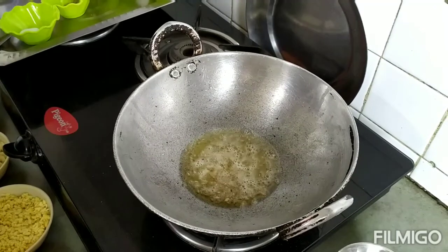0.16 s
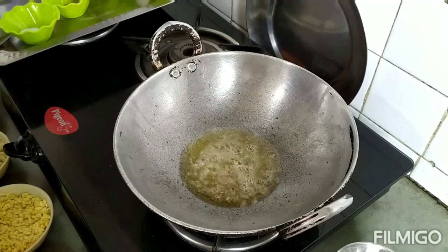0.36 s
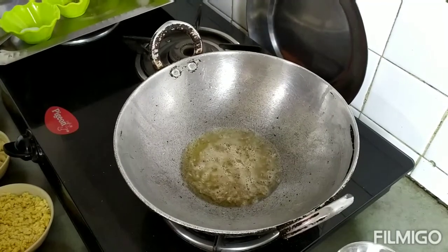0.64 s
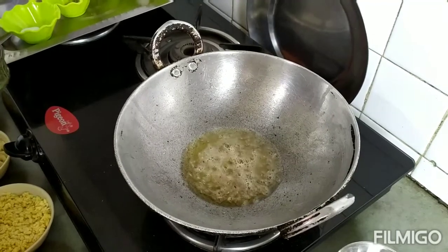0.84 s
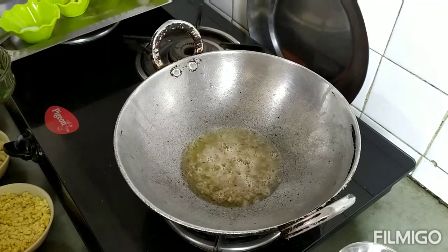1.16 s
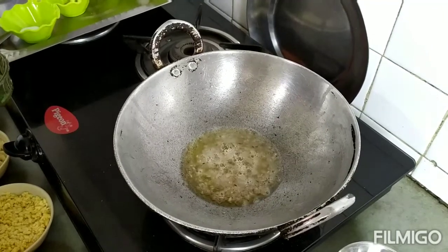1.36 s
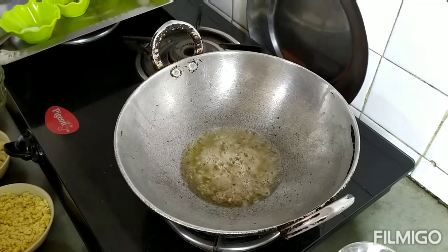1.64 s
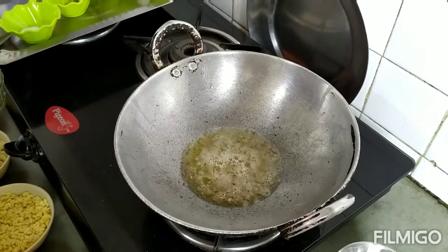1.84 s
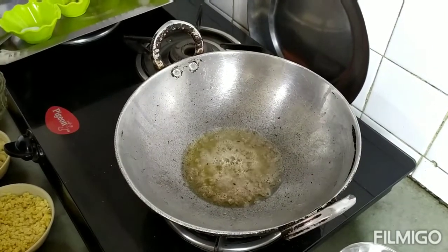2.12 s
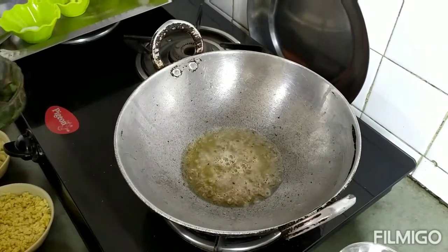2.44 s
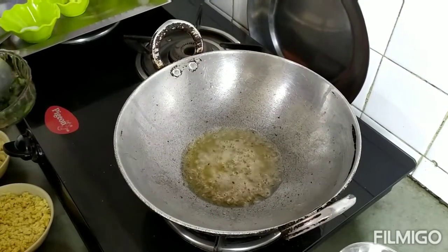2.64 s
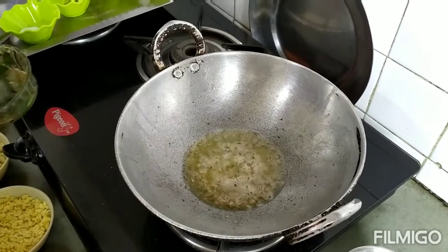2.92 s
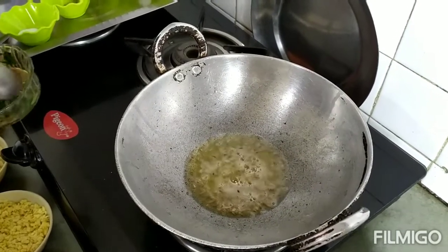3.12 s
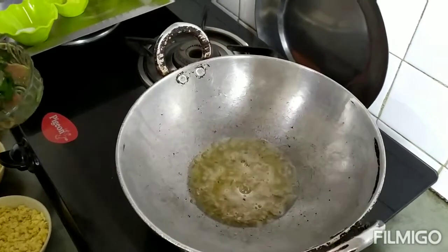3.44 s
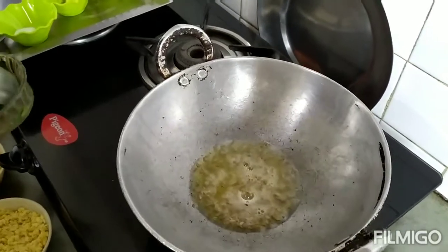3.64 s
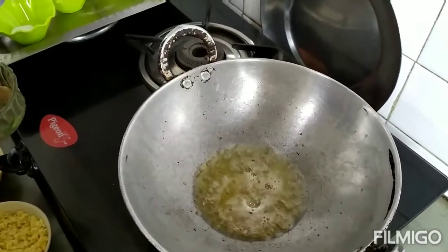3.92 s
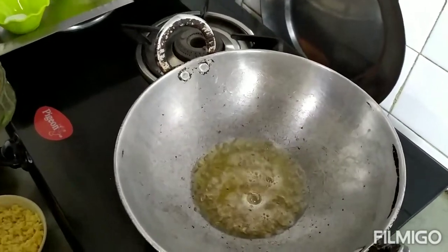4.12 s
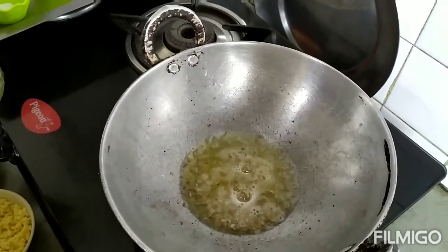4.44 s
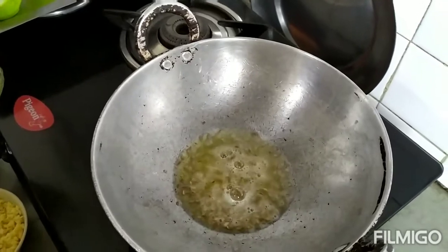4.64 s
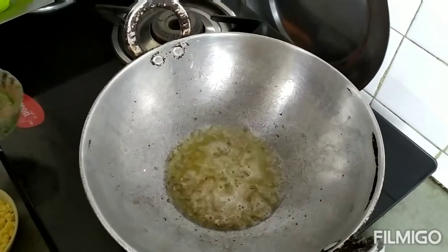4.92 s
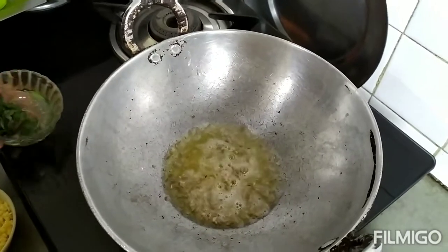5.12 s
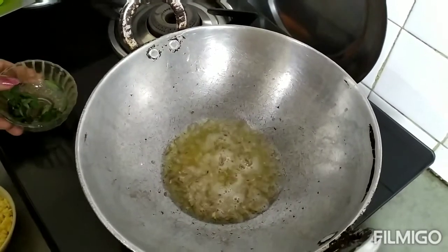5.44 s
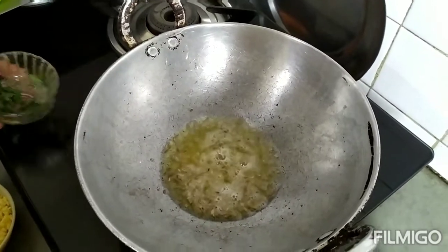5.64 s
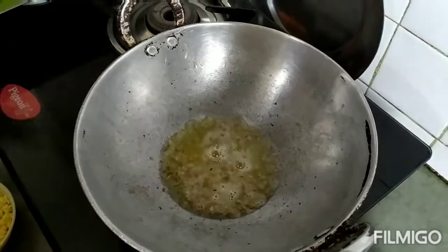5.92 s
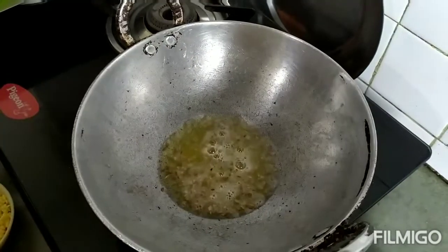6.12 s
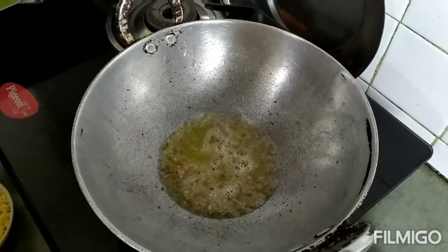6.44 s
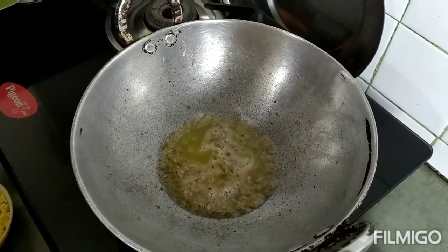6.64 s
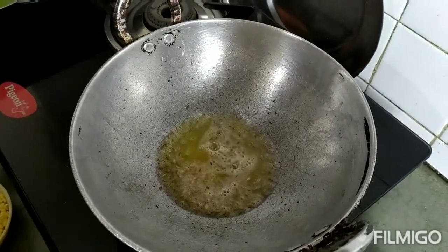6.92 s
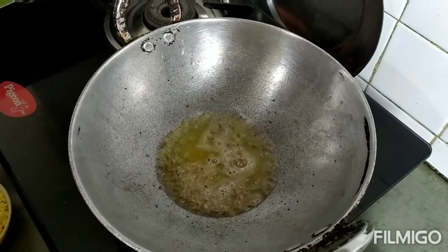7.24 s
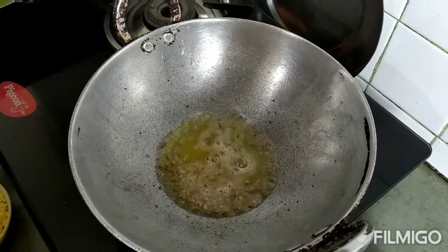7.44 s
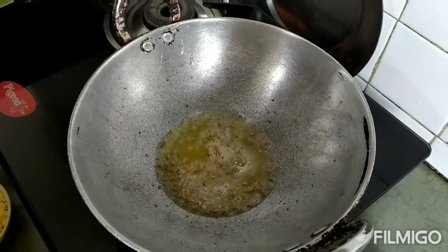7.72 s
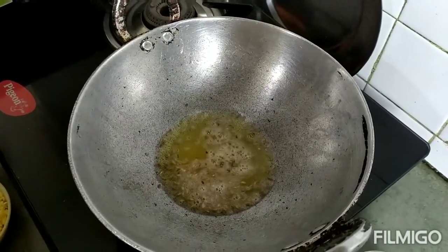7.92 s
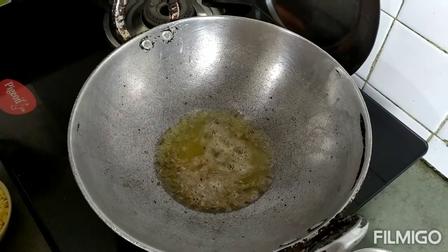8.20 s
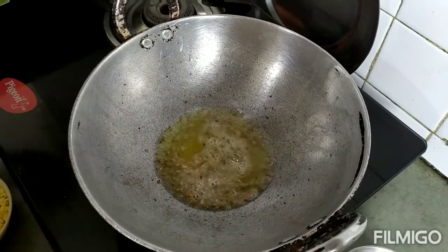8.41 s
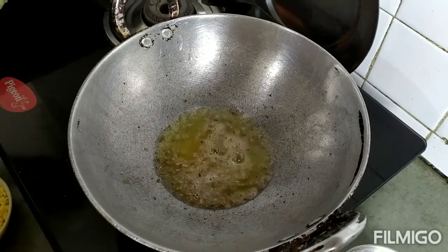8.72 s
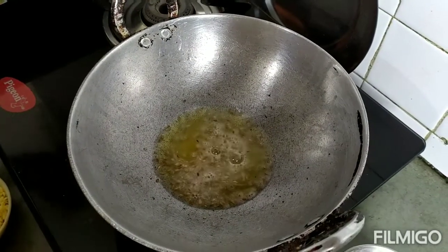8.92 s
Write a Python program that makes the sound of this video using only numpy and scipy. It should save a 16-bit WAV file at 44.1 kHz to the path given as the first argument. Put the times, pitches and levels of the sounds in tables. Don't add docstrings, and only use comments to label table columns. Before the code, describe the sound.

Sparse weak pops open the scene, then sharper, brighter seed cracks come unevenly from hot oil in a metal bowl-shaped pan. Glass clinks ring briefly in the middle, the sizzle rises a little, and a dish knocks and scrapes gently. The phone is held close, with light handling rustle and low taps on the left, in a hard, tiled home kitchen with short reverberation.

```python
import sys
import numpy as np
from scipy import signal
from scipy.io import wavfile
from scipy.ndimage import uniform_filter1d

SR = 44100
rng = np.random.default_rng(int(sys.argv[2]) if len(sys.argv) > 2 else 0)


def generate_wav(sig):
    pcm = np.round(np.clip(np.atleast_2d(sig).T, -1, 1) * 32767).astype(np.int16)
    wavfile.write(sys.argv[1], SR, pcm)


def amplitude_ratio(level_db):
    exponent = np.asarray(level_db, float) / 20
    return 10 ** exponent


N = 399987


def rms_one(x):
    return x / np.sqrt(np.mean(x ** 2) + 1e-20)


def at_hz(points, hz):
    points = np.array(points)
    return np.interp(np.log(hz), np.log(points[:, 0]), points[:, 1])


def in_time(rows):
    s, *columns = np.transpose(rows)
    return [np.interp(np.arange(N) / SR, s, column) for column in columns]


def drift(rate):
    r = np.exp(-80 * np.pi * rate / SR)
    white = rng.standard_normal(N // 40 + 2002)
    slow = signal.lfilter([1], [1, -2 * r, r * r], white)[2000:]
    return np.interp(np.arange(N) / 40, np.arange(len(slow)), rms_one(slow))


def ring(x, hz, t60):
    r, w = amplitude_ratio(-60 / (t60 * SR)), 2 * np.pi * hz / SR
    return signal.lfilter([0, np.sin(w)], [1, -2 * r * np.cos(w), r * r], x + 1e-18)


def resonate(x, peaks):
    return sum(amplitude_ratio(db) * np.sqrt(width) * ring(x, hz, 2.2 / width) for hz, width, db in peaks)


def bands(white, low_hz, high_hz):
    edges = low_hz * 2 ** np.arange(0, np.log2(high_hz / low_hz), .4)
    for k, (low, high) in enumerate(zip(edges, edges[1:])):
        band = signal.butter(2, [low, high], "band", fs=SR, output="sos")
        yield np.sqrt(low * high), signal.sosfilt(band, white[k % 2])


def coloured(white, spectrum, patchy_db):
    parts = bands(white, spectrum[0][0], spectrum[-1][0] * 1.2)
    return rms_one(sum(amplitude_ratio(at_hz(spectrum, hz) + patchy_db * drift(16)) * part for hz, part in parts))


def grains(per_s, spread_db, shape):
    sizes = amplitude_ratio(spread_db * np.minimum(rng.exponential(1, shape), 5)) * rng.choice([-1, 1], shape)
    return rms_one(sizes * (rng.random(shape) < per_s / SR))


def strokes(rows, fades_db_per_s):
    t = np.arange(N) / SR
    gain = 0
    for s, db, attack, hold in rows:
        rise_db = 25 * np.clip(1 - (t - s) / attack, 0, 9)
        fade_db = fades_db_per_s * np.maximum(t - s - attack - hold, 0)
        gain = gain + amplitude_ratio(db - rise_db - fade_db) * (t > s)
    return gain


def add(track, sound, s):
    i = round(s * SR)
    track[..., i:i + sound.shape[-1]] += sound[..., :N - i]


# t/s, peak level/dB, cavity f/Hz, left-right level/dB, low thud level/dB
POPS = [(0.072, -39, 3490, 2, -18.5), (1.091, -46, 3270, 3, -40), (1.944, -19.5, 3570, -6, -31),
        (2.176, -32.5, 3230, -7.5, -18), (2.836, -42, 3590, -4, -8.5), (2.859, -44, 2820, -7, -6),
        (2.88, -40.5, 2840, 5, -29.5), (2.907, -46, 2830, 1, -11.5), (3.748, -34.5, 3100, -1.5, -19),
        (3.809, -20, 2640, -7, -42), (4.295, -20.5, 2780, -2, -12), (4.489, -31, 2860, -2, -19.5),
        (4.993, -21.5, 3900, 13, -35), (5.398, -12, 3300, 9.5, -19.5), (5.64, -30.5, 3230, 16, -24),
        (6.123, -53, 2850, -1, -10), (6.744, -18, 3204, 6, -43), (7.517, -36.5, 3370, -6.5, -19),
        (7.567, -34.5, 2850, -10, -18), (8.204, -20, 3020, -12.5, -12), (8.692, -25.5, 2730, 7, -14.5)]
CRACK_DB = [-6, -1, -7, -1, -2, -3, 5, -4, 9.5, -3, -9.5, -1.5, -4, -7, -9, -15, -8.5, -5, -16, -9, -16]


def pops():
    near, source = np.zeros((2, N)), np.zeros(N)
    t = np.arange(2048) / SR
    push = np.exp(-t / .00004) * t / .00004
    small = signal.butter(2, 650, "high", fs=SR, output="sos")
    bright = signal.butter(2, [5500, 11000], "band", fs=SR, output="sos")
    broad = signal.butter(2, [1300, 5500], "band", fs=SR, output="sos")
    port_lag_s, wall_s, wall_db = 0.0003, 0.005, -17
    pan_echo_db, pan_echo_fades_db_per_s = -9, 3000
    for (s, db, hz, pan_db, thud_db), crack_db in zip(POPS, CRACK_DB):
        burst = ring(push, hz, .0045)
        burst += .7 * ring(push, hz * rng.uniform(1.25, 1.45), .003)
        burst -= .3 * ring(push, hz * rng.uniform(.75, .85), .004)
        burst += amplitude_ratio(thud_db + 1.5) * (ring(push, 964, 0.02) - 2.4 * ring(push, 1600, 0.0017))
        crack = rng.standard_normal(len(t)) * np.exp(-t / 0.0011)
        burst += amplitude_ratio(crack_db) * signal.sosfilt(bright, crack)
        burst += amplitude_ratio(9.5) * signal.sosfilt(broad, push)
        burst = signal.sosfilt(small, burst)
        burst *= amplitude_ratio(db + 3.5) / np.max(np.abs(burst))
        add(source, burst, s)

        click = np.eye(1, SR // 4)[0]
        pan_hum = ring(click, 947 + rng.normal(0, 25), .2)
        add(near, amplitude_ratio(db + thud_db / 2 - 21.5) * pan_hum * np.ones((2, 1)), s + .002)

        heard = np.zeros((2, 2 * len(t) - 1))
        for port, side in enumerate((1, -1)):
            paths = np.zeros(len(t))
            paths[round(port_lag_s * SR) * (1 - port)] = 1
            pan_lags = rng.uniform(.0003, .003, 8)
            wall_lags = wall_s + rng.uniform(-.002, .005, 8)
            lags = np.r_[pan_lags, wall_lags]
            echo_db = np.r_[pan_echo_db - pan_echo_fades_db_per_s * pan_lags, np.full(8, wall_db)]
            paths[(lags * SR).astype(int)] = rng.normal(0, 1, 16) * amplitude_ratio(echo_db)
            heard[port] = amplitude_ratio(side * pan_db / 2) * rms_one(np.convolve(burst, paths))
        add(near, amplitude_ratio(db + 5.5) * heard / np.max(np.abs(heard), axis=1).mean(), s + .001)
    return near, source


# t/s, peak level/dB, left-right level/dB
CLINKS = [
    (3.303, -24.5, -4),
    (3.359, -41.5, -12),
    (3.515, -47, 2),
    (4.138, -20.5, -10),
    (4.681, -23.5, -5),
]
# f/Hz, level/dB, t60/s
BOWL_RIM = [(1626, -16, .05), (2100, -12, .04), (2557, 2, .4), (3031, -11, .06), (4150, -4, .04),
            (6288, -1, .3), (6724, -10, .1), (8215, -8, .1), (10360, -8, .1), (10930, -4, .12),
            (11250, -4, .12), (11840, -4, .12), (13270, -7, .15), (14430, -9, .15)]
# f/Hz, level/dB, t60/s
BOWL_SIDE = [(2630, -3, .45), (3350, -9, .05), (3903, -7, .05), (6150, 0, .2), (6428, -2, .24),
             (6900, -8, .1), (8700, -10, .08), (9200, -6, .12), (10400, -8, .08), (10950, -2, .15),
             (12620, -1, .14), (13240, -2, .25), (14430, -5, .25)]
# f/Hz, level/dB, t60/s
BOWL_FOOT = [(1100, -20, .05), (1760, -15, .05), (2592, -7, .2), (3660, -7, .06), (5130, -11, .05),
             (6340, -7, .2), (7790, -10, .06), (8263, -9, .08), (10870, -9, .08), (12000, -4, .17),
             (13180, 0, .17), (14460, -9, .17), (15720, -12, .08)]


def clinks():
    near, source = np.zeros((2, N)), np.zeros(N)
    t = np.arange(SR // 2) / SR
    swell = 1 - np.exp(-(t / 0.003) ** 2)
    touched = (BOWL_RIM, BOWL_RIM, BOWL_RIM[2:6], BOWL_SIDE, BOWL_FOOT)
    for (s, db, pan_db), modes in zip(CLINKS, touched):
        sound = 0
        for hz, mode_db, t60 in modes:
            rub = rng.standard_normal((2, len(t))) * t / .0035 * np.exp(-t / 0.0047)
            chatter = ring(rub, hz, .005)
            splits = hz + 28 * np.sqrt(hz / 2600) * rng.normal(0, 1, 4)
            tones = sum(np.sin(2 * np.pi * (split * t + rng.random((2, 1)))) for split in splits)
            decay = amplitude_ratio(-60 * t / .05) + amplitude_ratio(-14 - 60 * t / t60)
            mode = tones * swell * decay + amplitude_ratio(9) * chatter / np.max(np.abs(chatter))
            shade_db = pan_db * hz / 10000 * np.array([[.5], [-.5]])
            sound = sound + amplitude_ratio(mode_db + shade_db) * mode
        sound *= amplitude_ratio(db + .5) / np.max(np.abs(sound.mean(axis=0)))
        add(near, sound, s - .002)
        add(source, sound[1], s - .002)
    return near, source


# t/s, level/dB, attack/s, hold/s
DRAGS = [
    (6.591, -38, 0.0049, .012),
    (6.09, -71.5, 0.012, 0.15),
    (6.64, -61, 0.0406, 0.066),
    (6.68, -59, 0.13, 0.11),
    (6.919, -46.5, 0.0053, 0.016),
    (6.938, -39.5, 0.0049, 0.027),
    (7.0, -62, 0.015, 0.025),
]
# f/Hz, width/Hz, level/dB
DISH = [(365, 40, -9), (670, 90, 5), (1159, 60, -2), (1500, 200, -6), (2000, 110, -3), (2530, 120, -4),
        (2840, 150, -8), (3555, 180, -3), (4100, 220, -4), (5000, 250, -8)]
# f/Hz, spectral level/dB per Hz
GRIT = [(120, -30), (200, -27.5), (360, -4.5), (571, -5), (658, 7), (1440, -13), (1980, 0), (9810, -21),
        (14000, -31)]


def drags():
    slips = grains(4000, 4.0, (2, 2, N))
    body = rms_one(resonate(slips[0], DISH)) + amplitude_ratio(9.0) * coloured(slips, GRIT, patchy_db=3.0)
    middle = body.mean(axis=0)
    treble = signal.butter(2, 900, "high", fs=SR, output="sos")
    body = middle + signal.sosfilt(treble, body - middle)
    sound = strokes(DRAGS, fades_db_per_s=186) * amplitude_ratio(-4 + 0.95 * drift(60)) * body
    return sound, sound[0]


# t/s, peak level/dB
TAPS = [(3.948, -52.5), (3.978, -52), (4.036, -77), (4.232, -51), (5.025, -48.5), (5.562, -32.5),
        (6.336, -42.5), (7.357, -46.5), (7.733, -51.5), (7.917, -47.5), (8.106, -45), (8.398, -47),
        (8.831, -47), (8.933, -54)]


def taps():
    out, t = np.zeros((2, N)), np.arange(4096) / SR
    for s, db in TAPS:
        width = .0009 * amplitude_ratio(-.7 * (db + 52))
        bump = np.exp(-(t / width - 2) ** 2)
        wobble = amplitude_ratio(-6.5) * np.sin(2 * np.pi * 60 * t) * np.exp(-t / 0.017)
        add(out[0], amplitude_ratio(db + 6.5) * (bump - wobble), s + 0.0031)
    return signal.sosfilt(signal.butter(2, 70, "high", fs=SR, output="sos"), out)


# t/s, peak level/dB, f/Hz
TICK = [(6.8325, -23.5, 12020)]


def tick():
    (s, db, hz), out = TICK[0], np.zeros(N)
    burst = np.zeros(400)
    burst[:9] = np.hanning(9) * np.sin(2 * np.pi * hz * np.arange(9) / SR)
    add(out, amplitude_ratio(db + 4.5) * ring(burst, hz, 0.00099), s)
    return out * amplitude_ratio([[-25], [0]]), out


# t/s, level/dB, attack/s, hold/s
SEEP = (8.78, -65, .04, .2)
# f/Hz, width/Hz, level/dB
SEEP_TONE = [(1680, 90, 0)]


def seep():
    hiss = resonate(rng.standard_normal((2, N)), SEEP_TONE)
    return strokes([SEEP], fades_db_per_s=127) * rms_one(resonate(hiss, SEEP_TONE))


# t/s, peak level/dB, f/Hz, left-right level/dB
FAINT = [(1.05, -61.5, 1860, 4), (1.111, -69, 2480, -10.5), (2.32, -73.5, 1530, -24),
         (2.467, -63, 2190, -11.5), (2.601, -60.5, 2213, -5), (3.027, -61, 2240, 11),
         (3.108, -73.5, 2640, 28.5), (3.189, -85, 2660, 0), (3.653, -70, 785, 52), (5.199, -55.5, 2440, 5),
         (5.319, -46.5, 2415, 9), (5.779, -71.5, 2540, 34), (6.002, -52, 2400, 4), (6.1, -63, 1376, -4.5),
         (6.15, -62, 897, -3), (6.176, -54.5, 2470, -2), (6.22, -57, 2320, -12), (7.324, -72.5, 1102, 29),
         (7.745, -66.5, 655, 31), (7.798, -65.5, 1000, 19.5), (8.603, -61.5, 1350, -2),
         (8.799, -57, 2500, 5), (8.95, -55.5, 2503, 12), (9.042, -48.5, 2190, -1)]


def faint():
    near, t = np.zeros((2, N)), np.arange(2048) / SR
    for s, db, hz, pan_db in FAINT:
        rub = rng.standard_normal((2, len(t))) * t * np.exp(-t / 0.0089)
        knock = ring(rub, hz, 0.017) + 1.6 * ring(rub, 0.95 * hz, 0.0045)
        sides = amplitude_ratio(db + pan_db * np.array([[.5], [-.5]]))
        add(near, sides * knock / np.max(np.abs(knock)), s - .004)
    return near


# t/s, level/dB, attack/s, hold/s
RATTLE = (7.8, -57, .08, .6)
# f/Hz, width/Hz, level/dB
RATTLE_BODY = [(3130, 60, -9), (3490, 45, -1), (3870, 60, -1), (3670, 200, -13), (4150, 60, -9)]


def rattle():
    phase = np.cumsum(30 * amplitude_ratio(3.0 * drift(6))) / SR
    pulses = np.exp(0.5 * np.cos(2 * np.pi * phase)) * rng.standard_normal((5, 2, N))
    body = sum(resonate(pulse, [peak]) for pulse, peak in zip(pulses, RATTLE_BODY))
    return strokes([RATTLE], fades_db_per_s=127) * rms_one(body)


# t/s, level/dB
OIL = [(0, -64), (.6, -70), (2.6, -65), (3.6, -64), (4.3, -57.5), (5.4, -56), (5.7, -58.5), (6.7, -60.5),
       (7.1, -61), (9.07, -58)]
# f/Hz, spectral level/dB per Hz
FIZZ = [(4500, 6), (6000, 5.5), (8000, 14), (9900, 11), (12000, 7.5), (14000, -4), (16000, -33.5)]
# f/Hz, spectral level/dB per Hz
SIZZLE = [(300, -15), (600, -9), (1200, -0.5), (2000, -21.5), (3000, 7), (4000, 13.5), (5500, 5.5),
          (7000, -7.5)]


def oil():
    heat_db, = in_time(OIL)
    bubbles = grains(8500, 2.9, (2, 2, N))
    fizz_db = -58 + 0.11 * (heat_db - heat_db.mean())
    fizz = amplitude_ratio(fizz_db) * coloured(bubbles, FIZZ, patchy_db=1.44)
    sizzle = amplitude_ratio(heat_db + 0.74 * drift(3.5)) * coloured(bubbles[::-1], SIZZLE, patchy_db=3.5)
    return fizz + sizzle


# t/s, level/dB, attack/s, hold/s
GRIPS = [(.12, -74, 0.18, 0.033), (3.42, -64, 0.021, 0.023), (3.57, -63, 0.018, 0.015),
         (3.63, -64, 0.014, 0.021), (3.74, -62.5, 0.042, 0.085), (3.85, -75, 0.23, 0.38),
         (4.2, -77, 0.064, 0.5), (5.0, -74.5, 0.17, 0.414), (6.05, -77, 0.053, 0.056),
         (6.62, -76, 0.15, 0.062), (7.6, -74.5, 0.15, 0.0314)]
# f/Hz, spectral level/dB per Hz
RUMBLE = [(35, -18.5), (50, 3), (100, 5), (150, 5.5), (210, -11), (300, -24)]
# f/Hz, spectral level/dB per Hz
RUSTLE = [(200, -3), (300, -5), (500, -10), (800, -27.5)]


def handling(shared, own):
    grip = strokes(GRIPS, fades_db_per_s=181)
    rumble = (amplitude_ratio(-65.5) + amplitude_ratio(3) * grip) * coloured(shared + 0.64 * own, RUMBLE, patchy_db=2.0)
    rustle = (amplitude_ratio(-100.5) + amplitude_ratio(2.0) * grip) * coloured(own, RUSTLE, patchy_db=5.5)
    return rumble + rustle * amplitude_ratio([[2.5], [-2.5]])


# t/s, level/dB
FLAME = [(0.0, -52.5), (0.12, -66), (0.7, -56), (0.75, -63), (5.41, -59), (5.51, -55), (6.04, -64.5),
         (6.14, -55), (8.44, -66), (9.02, -53.5), (9.07, -63)]


def flame(shared, own):
    hum_db, = in_time(FLAME)
    hum_hz, hum_width_hz = 75.6, 4.1
    hum = resonate(shared[0] + 0.17 * own[0], [(hum_hz, hum_width_hz, 0)])
    hum = resonate(hum, [(hum_hz, 40, 0)])
    power = uniform_filter1d(np.mean(hum ** 2, axis=0), size=SR // 8)
    return amplitude_ratio(hum_db) * rms_one(hum / power ** .42)


def steady():
    shared, own = rng.standard_normal((2, 1, N)), rng.standard_normal((2, 2, N))
    return oil() + handling(shared, own) + flame(shared, own)


# f/Hz, t60/s
ROOM = [(400, 0.73), (1000, 0.31), (2500, 0.42), (5000, 0.24), (9000, 0.41), (14000, 0.14)]
# f/Hz, level/dB
ROOM_COLOUR = [(400, -12), (1000, 1.5), (2500, 1), (5000, 12), (9000, 2), (14000, -6.5)]


def room(x, wet_db):
    t = np.arange(SR // 2) / SR
    sides = np.array([[1, 1], [1, -0.75]])
    tail = 0
    for hz, part in bands(rng.standard_normal((2, 2, len(t))), 250, 18000):
        decay = amplitude_ratio(at_hz(ROOM_COLOUR, hz) - 60 * t / at_hz(ROOM, hz))
        tail = tail + decay * (sides * [1, min(hz / 1400, 1)] @ part)
    tail = tail * (1 - np.exp(-(t / 0.001) ** 2)) * amplitude_ratio(wet_db - 7) / np.sqrt(SR)
    return signal.fftconvolve(x[None], tail, axes=1)[:, :N]


def scene():
    (pop, pop_dry), (clink, clink_dry), (spit, spit_dry), (drag, drag_dry) = pops(), clinks(), tick(), drags()
    sent = amplitude_ratio(-0.78) * pop_dry + amplitude_ratio(-6) * clink_dry + amplitude_ratio(-6) * spit_dry + amplitude_ratio(-11.5) * drag_dry
    close = pop + clink + drag + taps() + spit + seep()
    return close + faint() + rattle() + steady() * amplitude_ratio([[-.7], [.7]]) + room(sent, wet_db=18.5)


# f/Hz, level/dB per bin
KEPT = [(150, -112), (300, -97), (1000, -89), (3200, -95), (5300, -95), (9000, -108), (12600, -106),
        (13400, -82.5)]


def thin_spectrum(x):
    x = np.pad(x, ((0, 0), (415, 0)))
    hz, _, frames = signal.stft(x, SR, "cosine", nperseg=2048)
    band = (10 * np.log1p(hz / 600) + hz / 700).astype(int)
    member = band == np.unique(band)[:, None]
    bins = member.sum(axis=1)
    power = member / bins[:, None] @ np.abs(frames) ** 2
    count = frames.shape[2]

    treble = np.abs(signal.lfilter([1, -1], [1], x)).max(axis=0)
    peak = np.maximum.reduceat(np.r_[np.zeros(512), treble], np.arange(count - 1) * 1024)
    attack = np.convolve(peak > 1.9 * np.roll(peak, 1), [1, 1, 1, 1])[1:count + 1] > 0

    limit = amplitude_ratio(at_hz(KEPT, member @ hz / bins + 1))[:, None] * np.where(attack, amplitude_ratio(-48.0), 1)
    wander = uniform_filter1d(rng.standard_normal((1, *power.shape[1:])), size=3)
    limit = limit * amplitude_ratio(8.4 * wander)
    busy = power[:, len(member) // 2:].mean(axis=(0, 1))
    limit = limit * (busy / np.median(busy)) ** 0.072

    row = member.argmax(axis=0)
    near = uniform_filter1d((np.abs(frames) ** 2).mean(axis=0), size=5, axis=0)
    step = np.maximum(limit[0] ** 2, amplitude_ratio(-4.5) * power.mean(axis=0) * ~attack)[row]
    step = step * np.where(hz > 300, 1, 0)[:, None]
    luck = 2 * uniform_filter1d(rng.standard_normal((len(hz) // 8 + 1, len(attack))), size=4)
    luck = luck[np.arange(len(hz)) // 8]
    middle = ((hz > 2500) & (hz < 8500))[:, None]
    step = step + (luck < -1.4) * middle * ~attack
    kept = (power.mean(axis=0) > limit ** 2)[:, row] & (near > step)
    return signal.istft(frames * kept, SR, "cosine", nperseg=2048)[1][:, 415:N + 415]


def top_cut(x):
    return signal.sosfilt(signal.butter(12, 15960, fs=SR, output="sos"), x)


def record(dry):
    mix = thin_spectrum(dry)
    return top_cut(mix)


dry = scene()
out = record(dry)
generate_wav(out)
```